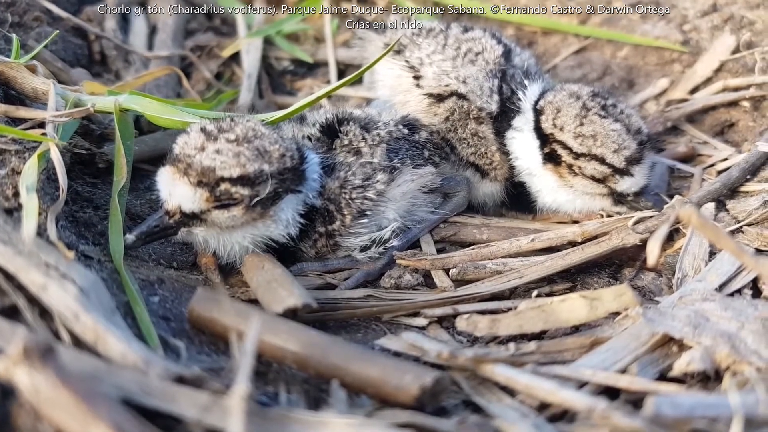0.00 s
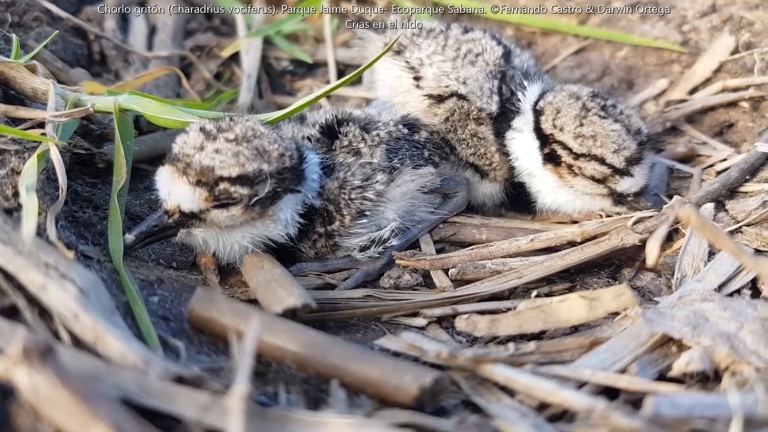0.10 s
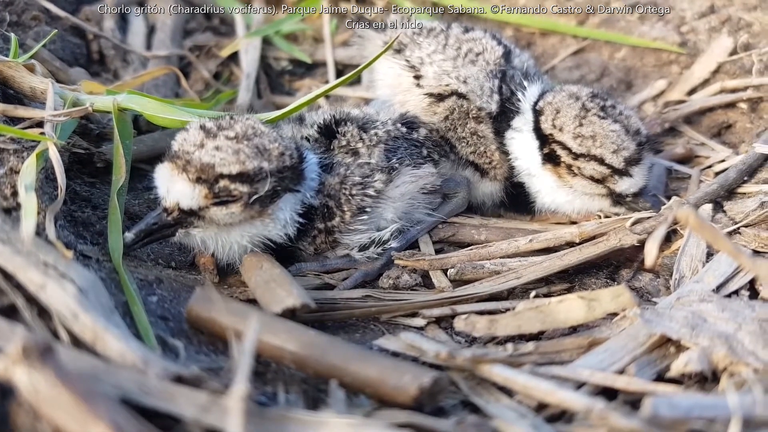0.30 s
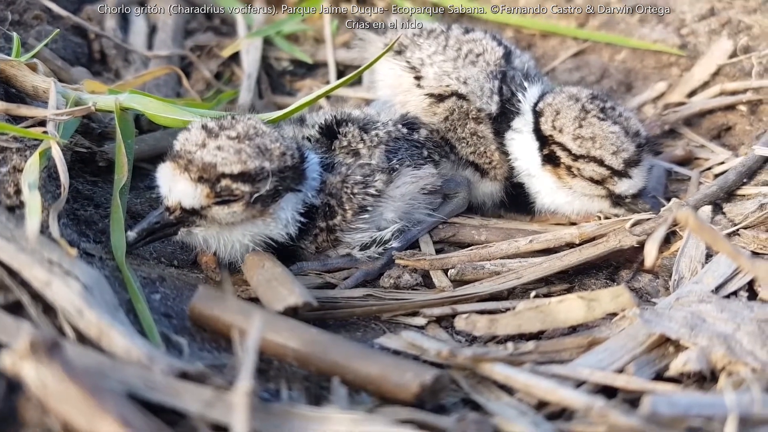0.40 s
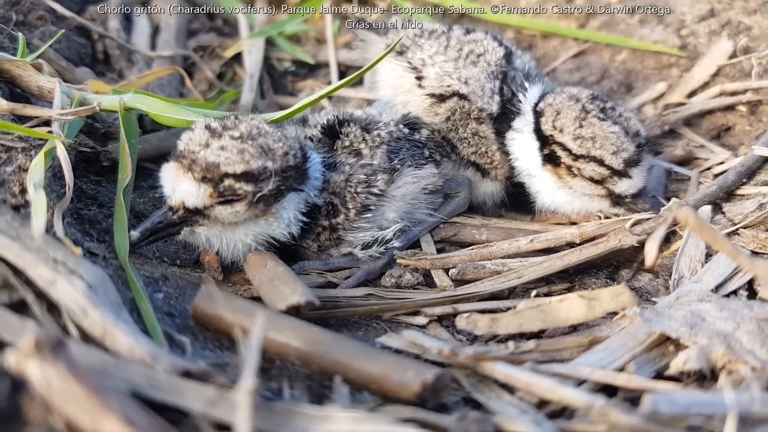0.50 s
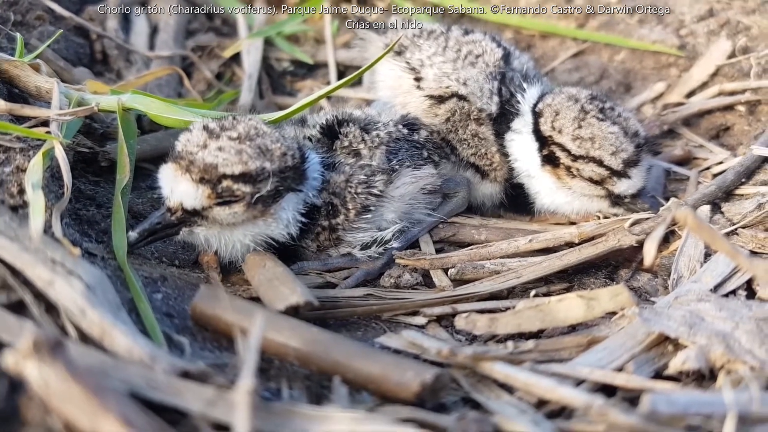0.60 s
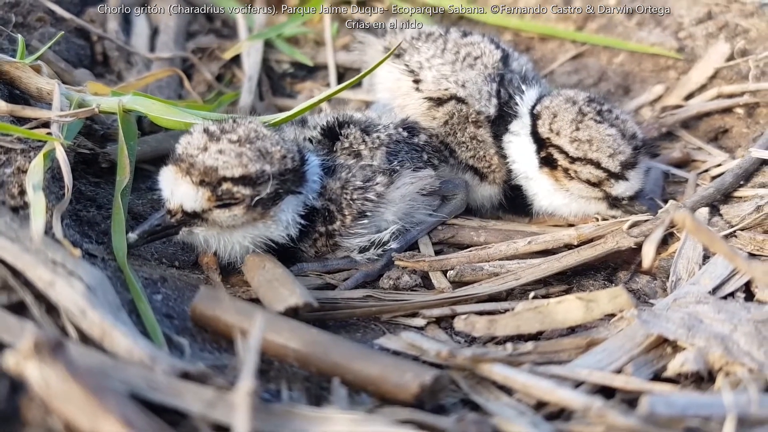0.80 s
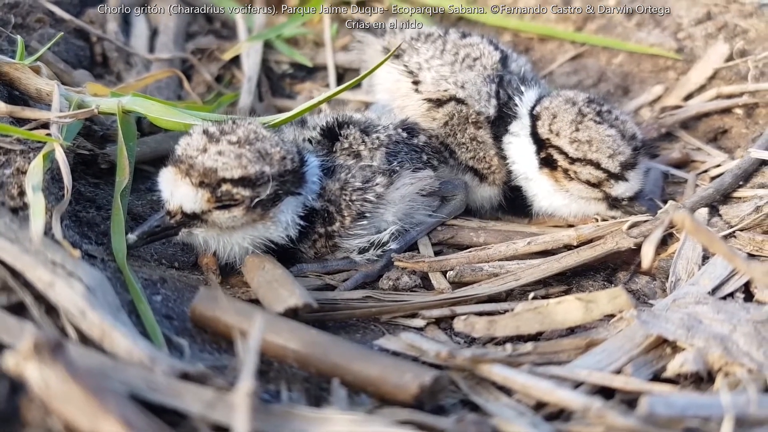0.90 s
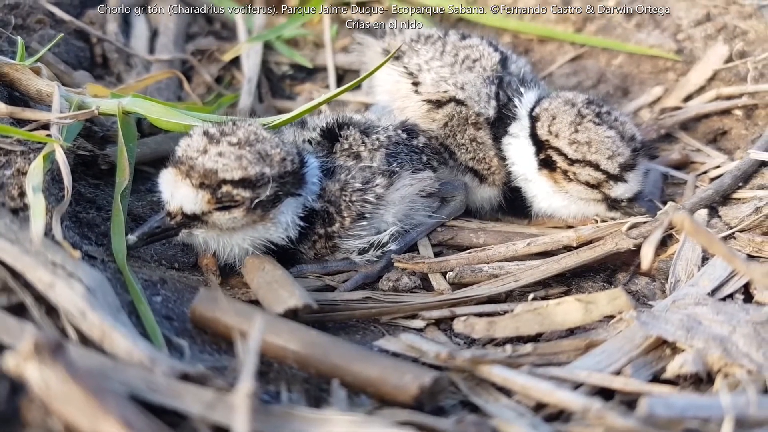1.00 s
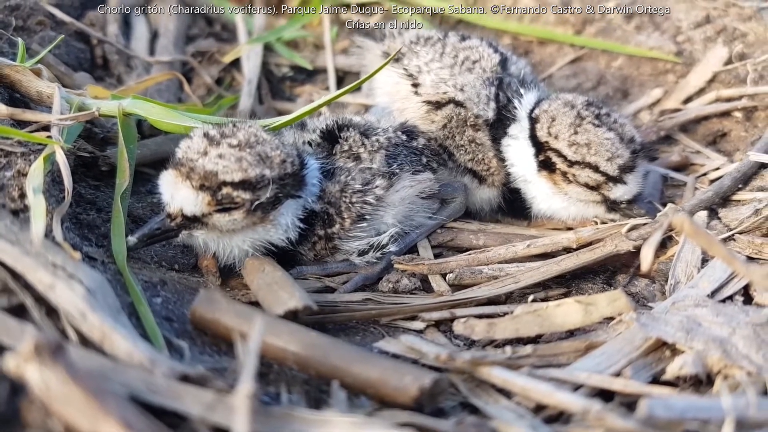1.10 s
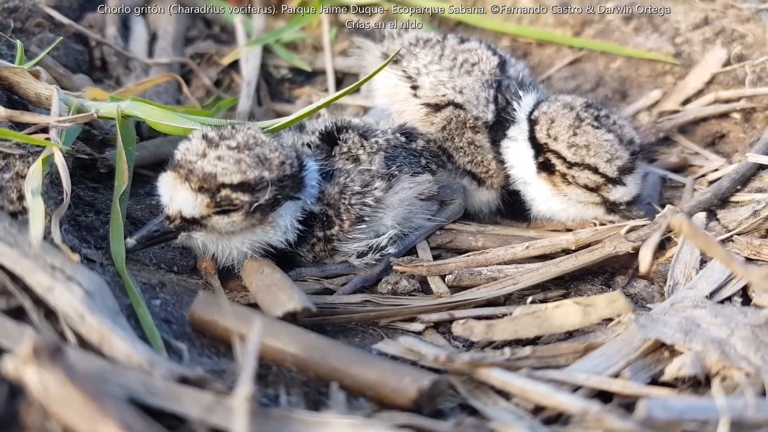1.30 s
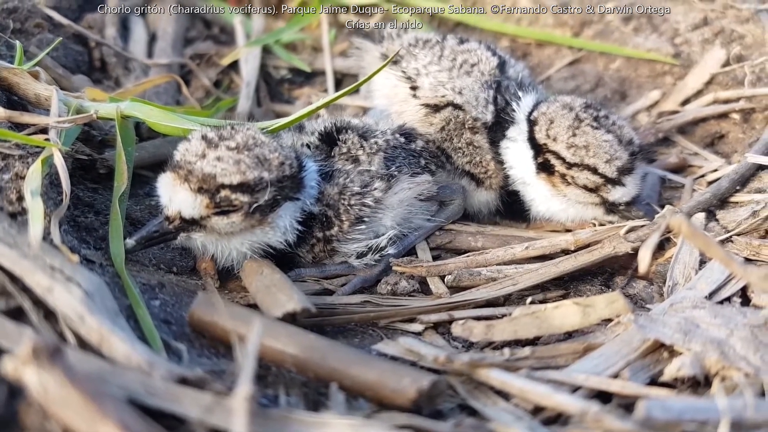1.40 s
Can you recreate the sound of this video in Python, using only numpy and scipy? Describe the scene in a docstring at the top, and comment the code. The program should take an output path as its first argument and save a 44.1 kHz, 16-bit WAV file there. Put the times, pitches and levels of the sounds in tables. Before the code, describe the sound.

A shorebird's loud piercing peep, followed by faint nasal chirps and a far whistle, outdoors

```python
"""A shorebird close by gives one sharp rising whistle, a modulated near-sine whose voice briefly breaks.
A farther bird answers with a faint long whistle built from partials; a third gives two short nasal
chirps, pulses through throat resonances. There are tiny sine peeps as well. Low outdoor rumble and hiss,
made of random spectra, reach a pair of spaced microphones, the right one first."""
import sys
import numpy as np
from scipy import signal
from scipy.io import wavfile
from scipy.ndimage import uniform_filter1d

SR = 44100
rng = np.random.default_rng(int(sys.argv[2]) if len(sys.argv) > 2 else 0)


def unload_audio(sound):
    """Save the sound as a 16-bit wav file, at the path given as the first command line argument."""
    columns = np.transpose(np.atleast_2d(sound))
    # keep every value between -1 and 1, then stretch to whole-number steps
    steps = np.round(np.clip(columns, -1, 1) * 32767)
    wavfile.write(sys.argv[1], SR, steps.astype(np.int16))


def voltage_ratio(level):
    """Linear amplitude factor for a level in decibels (scalar or array-like)."""
    return 10 ** (np.asarray(level, float) / 20)


N = 63945  # length in samples

# Contour of the near whistle. Each row: time in seconds, pitch in Hz, level in dB before a 3 dB lift,
# rasp in dB relative to the tone.
NEAR_CONTOUR = [(.203, 3180, -68, -27), (.207, 3262, -41, -28.5), (.218, 3900, -30.5, -34),
                (.2245, 4260, -39, -9.5), (.231, 4280, -37.5, -12.5), (.244, 4540, -25.5, -26),
                (.254, 4614, -23.5, -29.5), (.268, 4706, -22.5, -26), (.28, 4710, -22, -8),
                (.29, 4694, -23, -21), (.306, 4586, -19.5, -20.5), (.314, 4520, -23, -26.5),
                (.339, 4507, -25.5, -31.5), (.343, 4695, -24, -27), (.349, 4650, -24, -28),
                (.354, 4597, -26.5, -18.5), (.357, 4735, -25, -31), (.363, 4700, -27, -28),
                (.368, 4650, -24.5, -24), (.371, 4587, -23.5, -40), (.412, 4666, -23.5, -39.5),
                (.446, 4668, -29, -53), (.49, 4852, -29.5, -53.5), (.525, 4910, -33.5, -31.5),
                (.538, 4940, -48, -45), (.546, 4960, -93, -35.5)]
# Spells of a second, regular vibration of the near voice. Each row: start in seconds, length in seconds,
# sideband spacing in Hz, lower and upper sideband in dB relative to the tone.
VIBRATION_SPELLS = [(0.283, .024, 1560, -18, -23), (0.387, .02, 720, -31.5, -21.5)]
# Left-right balance of the near whistle, coloured by the microphones. Each row: pitch in Hz,
# left minus right in dB.
NEAR_BALANCE = [(3300, 5), (4500, 4.5), (4700, 8.5), (4900, 6.5)]
# Contour of the far whistle. Each row: time in seconds, pitch in Hz, level in dB, left minus right in dB.
FAR_CONTOUR = [(.975, 3994, -94, -3), (.986, 3962, -57.5, 1), (1.01, 3955, -48, -7.5),
               (1.016, 3895, -70, 0), (1.024, 3640, -55, -5.5), (1.03, 3586, -58, -9),
               (1.055, 3512, -63.5, -15), (1.08, 3566, -54.5, -9), (1.146, 3705, -55.5, 3),
               (1.18, 3743, -59, 14), (1.23, 3788, -60.5, -13), (1.26, 3850, -53, -9),
               (1.294, 3840, -52, -4.5), (1.352, 3860, -58, 5), (1.406, 3932, -48.5, -5),
               (1.45, 3893, -47, -3)]
# Partials above the far whistle's main tone. Each row: multiple of the pitch, level in dB relative to it.
FAR_OVERTONES = [(2, -30.5), (2.5, -31), (3, -36)]
# Lower octave of the far whistle. Each row: time in seconds, level in dB.
FAR_LOWER_OCTAVE = [(0.981, -88), (.99, -58), (1.008, -64), (1.02, -85), (1.08, -86), (1.15, -63),
                    (1.3, -63.5), (1.37, -64), (1.42, -79)]
# Nasal chirps. Each row: start in seconds, length in seconds, gain in dB, peak pitch in Hz.
CHIRP_CALLS = [(0.627, 0.094, -45.5, 835), (1.108, .085, -36.5, 850.5)]
# Resonances of the chirping bird's throat. Each row: centre in Hz, width in Hz, gain in dB,
# change of gain by the end in dB.
THROAT_RESONANCES = [(2430, 480, 7, -8.5), (3220, 400, 0.5, 7.5), (5700, 500, -5, -26),
                     (10500, 2900, -30, -22)]
# Faint peeps. Each row: start in seconds, length in seconds, pitch in Hz, level in dB.
PEEP_CALLS = [(.076, .02, 3150, -60), (.172, .016, 3130, -64), (.155, .01, 5200, -68)]
# Echoes off ground and brush. Each row: delay in seconds before a random shortening,
# level in dB before an offset set by each source.
ECHO_PATHS = [(.007, -4.5), (.019, -24.5), (0.034, -32)]
# Background spectrum. Each row: frequency in Hz, relative density in dB per Hz.
AIR_SPECTRUM = [(12, -60.5), (20, -29.5), (60, -0.5), (182, -12), (252, -16.5), (280, -11), (467, -16),
                (521, -18), (700, -19.5), (967, -25.5), (1200, -25.5), (3160, -39), (3620, -43.5),
                (4370, -43.5), (7100, -54.5), (10400, -57), (12500, -67.5), (16200, -104), (22000, -120)]
# Coherence of the background. Each row: frequency in Hz, left-right likeness from 0 to 1.
AIR_COHERENCE = [(40, 0), (90, 0.96), (160, 1), (350, 0.89), (570, 0.63), (850, 0.44), (1200, 0.42),
                 (2000, 0)]
# Balance of the background. Each row: frequency in Hz, left minus right in dB.
AIR_BALANCE = [(60, 0), (180, 0), (550, 3), (1650, 0.5), (4970, -6), (15000, 4)]
# Band levels of the background over time. Each row: time in seconds, change in dB of the middle band,
# of the band above the whistle and of the treble, each at its band centre.
AIR_BAND_LEVELS = [(0, -4.5, -10.5, -0.5), (.2, -4, 6, -3.5), (.33, 2, -1.5, -9.5), (.37, -1.5, -30.5, -11),
                   (.42, -2.5, -29, -10.5), (.46, 10.5, -21.5, -2.5), (.5, 6, -24, -16.5),
                   (.54, 7.5, 18, 2), (.6, 5.5, 4.5, -4.5), (.635, 6, 3.5, 14.5), (.7, 4, 2, 15),
                   (.74, 0, 1, -1), (0.951, -4.5, 0, -4.5), (1.1, -2, 2, -5), (1.17, 0.5, 8.5, 8),
                   (1.25, -6.5, 2.5, -1), (1.45, -2.5, 4.5, -2)]

WAVER_HZ = 17  # scale of the random pitch waver in both whistles


def evened(x):
    """Normalisation: scales a signal to rms 1."""
    return x / np.sqrt(np.mean(abs(x) ** 2) + 1e-20)


def read(points, hz):
    """Interpolation of a spectrum table on a logarithmic frequency axis."""
    f, value = np.transpose(points)
    return np.interp(np.log(hz + 1), np.log(f + 1), value)


def bump(start, length):
    """Windowing: a smooth sine-squared pulse in time."""
    return np.sin(np.pi * np.clip((np.arange(N) / SR - start) / length, 0, 1)) ** 2


def wobble(hz):
    """Low-pass filtering: complex noise of rms 1, slower than hz."""
    z = rng.standard_normal(N) + 1j * rng.standard_normal(N)
    return evened(signal.sosfilt(signal.butter(3, hz, fs=SR, output="sos"), z))


def resonate(x, hz, width):
    """Resonance: a peak of gain 1, applied twice for steep sides."""
    b, a = signal.iirpeak(hz, hz / width, SR)
    return signal.lfilter(b, a, signal.lfilter(b, a, x))


def place(x, pan_db, lag_s, echo_db):
    """Stereo by level and arrival time: pans, delays the left microphone, adds echoes that differ per side."""
    left = np.roll(x, round(lag_s * SR)) * voltage_ratio(pan_db / 2)
    right = x * voltage_ratio(-pan_db / 2)
    out = np.array([left, right])
    for delay, db in ECHO_PATHS:
        for side in range(2):
            samples = round(delay * SR * rng.uniform(.8, 0.96))
            out[side] += voltage_ratio(db + echo_db) * np.roll(x, samples)
    return out


def track(rows):
    """Phase as the integral of frequency: pitch, phase, gain and last column of a whistle table over time."""
    s, hz, db, last = np.transpose(rows)
    t = np.arange(N) / SR
    pitch = uniform_filter1d(np.interp(t, s, hz), size=60) + WAVER_HZ * wobble(210).real
    phase = 2 * np.pi * np.cumsum(pitch) / SR
    gain = np.sqrt(2) * voltage_ratio(np.interp(t, s, db, -150, -150))
    return pitch, phase, gain, np.interp(t, s, last)


def shifted_copy(phase, db):
    """Frequency translation: a faint flickering artefact, a copy of the tone shifted up by 9640 Hz."""
    flicker = abs(1 + .4 * wobble(200))
    return voltage_ratio(db) * flicker * np.cos(phase + 2 * np.pi * 9640 * np.arange(N) / SR)


def near_whistle():
    """Modulation of a near sine: noise gives rasp, regular vibration gives sidebands; an octave is added."""
    pitch, phase, gain, rasp_db = track(NEAR_CONTOUR)
    modulation = voltage_ratio(rasp_db) * (wobble(1210) + 0.26 * wobble(2900))
    for start, length, spacing_hz, below_db, above_db in VIBRATION_SPELLS:
        turn = np.exp(2j * np.pi * spacing_hz * np.arange(N) / SR) * (1 + .3 * wobble(200))
        sidebands = voltage_ratio(below_db) * turn.conj() + voltage_ratio(above_db) * turn
        modulation = modulation + bump(start, length) * sidebands
    tone = ((1 + modulation) * np.exp(1j * phase)).real
    tone = signal.sosfilt(signal.butter(4, [2600, 9000], "band", fs=SR, output="sos"), tone)
    breath = voltage_ratio(-16.5) * wobble(500)
    octave = voltage_ratio(-25.5) * ((1 + breath) * np.exp(2j * phase)).real
    main = place(gain * tone, read(NEAR_BALANCE, pitch), lag_s=.000273, echo_db=-20)
    upper = place(gain * octave, 3.3, lag_s=.00025, echo_db=-13.5)
    artefact = place(gain * shifted_copy(phase, -34), 9.4, lag_s=.0003, echo_db=-11)
    return voltage_ratio(3.0) * (main + upper + artefact)


def far_whistle():
    """Superposition of partials: a faint whistle of wavering left-right balance, over a weak lower octave."""
    _, phase, gain, balance_db = track(FAR_CONTOUR)
    overtones = sum(voltage_ratio(db) * np.cos(k * phase) for k, db in FAR_OVERTONES)
    upper = np.cos(phase) + overtones + shifted_copy(phase, -38)
    flutter = abs(1 + 0.17 * wobble(76))
    s, db = np.transpose(FAR_LOWER_OCTAVE)
    lower_gain = np.sqrt(2) * voltage_ratio(np.interp(np.arange(N) / SR, s, db, -150))
    lower = place(lower_gain * np.cos(phase / 2), 3.0, lag_s=0, echo_db=-12)
    # the balance is unsteady, as when echoes interfere
    return place(gain * upper * flutter, balance_db, lag_s=0, echo_db=-20.5) + lower


def chirp(start, length, db, hz):
    """Source and filter: pulses rise to a peak pitch, then fall at once, through fixed throat resonances."""
    rise, fall, scoop = .22, .27, .04  # rise as a share of the length; fall and scoop as shares of pitch
    fade_db, onset_s, release_s, roughness = -12, .004, .015, .25
    t = np.arange(N) / SR - start
    u = np.clip(t / length, 0, 1)
    falling = fall * np.maximum(u - rise, 0) / (1 - rise)
    scooping = scoop * np.maximum(1 - u / rise, 0)
    pitch = hz * (1 - falling - scooping) * (1 + .02 * wobble(310).real)
    turns = np.cumsum(pitch) / SR
    pulses = evened(sum(np.cos(2 * np.pi * k * turns) for k in range(1, 16)))
    drive = pulses + roughness * rng.standard_normal(N)
    shape = np.clip(t / onset_s, 0, 1) * voltage_ratio(fade_db * u ** 2) * np.clip((length - t) / release_s, 0, 1)
    shape = shape * abs(1 + .25 * wobble(70))
    throat = sum(voltage_ratio(gain_db + end_db * u) * resonate(drive * shape, centre, width)
                 for centre, width, gain_db, end_db in THROAT_RESONANCES)
    return place(voltage_ratio(db) * throat, -1.5, lag_s=.0005, echo_db=6.5)


def peeps():
    """Pure tones under a smooth window: tiny pips of steady pitch."""
    t = np.arange(N) / SR
    pips = sum(voltage_ratio(db) * np.sqrt(2) * bump(s, length) * np.sin(2 * np.pi * hz * t)
               for s, length, hz, db in PEEP_CALLS)
    return place(pips, 0, lag_s=0, echo_db=-4)


def air():
    """Partly coherent noise: patchy random short-time spectra, their band levels changing over time."""
    frames, hz = N // 256 + 5, np.fft.rfftfreq(1024, 1 / SR)[:, None]
    a, b, c, d, patches = rng.standard_normal((frames, 513, 5)).T
    patches = uniform_filter1d(patches, size=10, axis=0)
    patches = evened(uniform_filter1d(patches, size=8, axis=1))
    t = np.arange(frames) * 256 / SR
    s, middle_db, upper_db, treble_db = np.transpose(AIR_BAND_LEVELS)

    def near(centre, octaves):
        """Bell-shaped weighting on a logarithmic frequency axis."""
        return np.exp(-(np.log2((hz + 1) / centre) / octaves) ** 2)

    # the band above the whistle thins out under it
    change_db = near(2150, 1.1) * np.interp(t, s, middle_db)
    change_db += near(6500, 0.1) * np.interp(t, s, upper_db)
    change_db += near(9500, 0.82) * np.interp(t, s, treble_db)
    change_db += -30 * near(7040, 0.11)  # narrow gap in the hiss
    change_db -= 25 * (hz > 11800)  # sharp top of the hiss
    same = np.clip(read(AIR_COHERENCE, hz), 0, 1)
    right = a + 1j * b
    lag = np.exp(-2j * np.pi * hz * .0005)  # the left microphone hears the shared part 0.5 ms later
    left = same * right * lag + np.sqrt(1 - same ** 2) * (c + 1j * d)
    balance_db = read(AIR_BALANCE, hz)
    spectra = np.array([left * voltage_ratio(balance_db / 2), right * voltage_ratio(-balance_db / 2)])
    spectra = spectra * voltage_ratio(read(AIR_SPECTRUM, hz) + 1.2 * patches + change_db)
    noise = signal.istft(spectra, nperseg=1024, noverlap=768)[1][:, :N]
    return voltage_ratio(-38.5) * evened(noise)


def scene():
    """Superposition: the sound of all birds adds to the background."""
    chirps = sum(chirp(*row) for row in CHIRP_CALLS)
    return near_whistle() + far_whistle() + chirps + peeps() + air()


def top_cut(x):
    """Nothing passes above the cut-off."""
    return signal.sosfilt(signal.butter(12, 15820, fs=SR, output="sos"), x)


def record(dry):
    """Signal chain: the finished mix passes through its last stage."""
    return top_cut(dry)


dry = scene()
out = record(dry)
unload_audio(out)
```